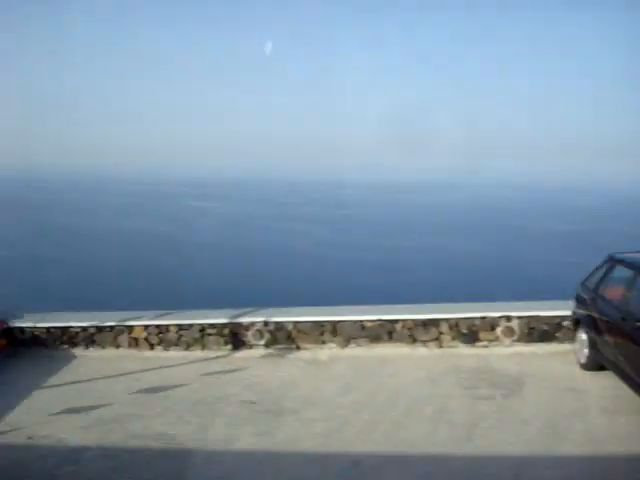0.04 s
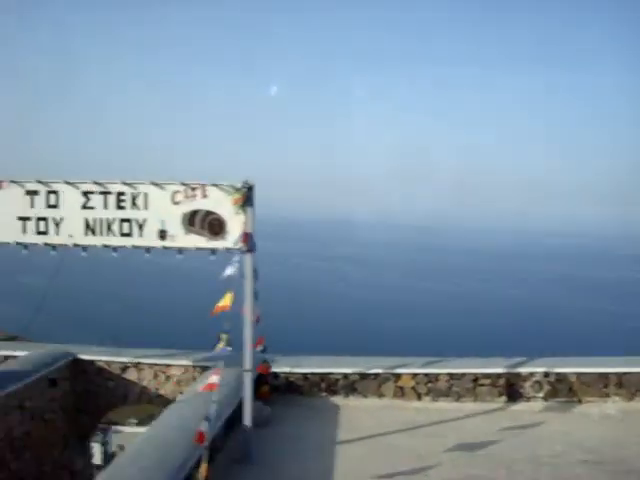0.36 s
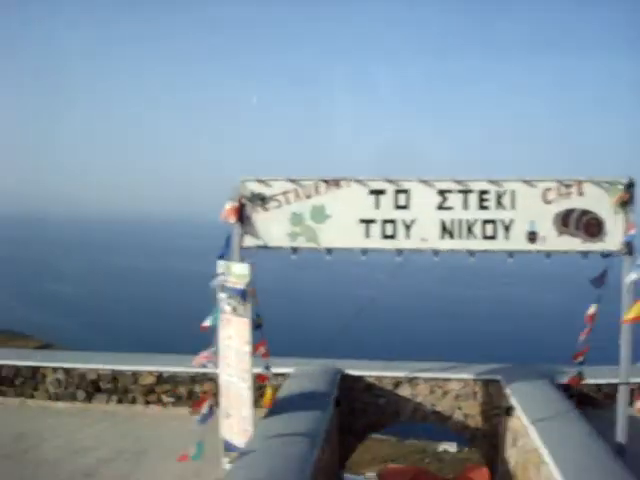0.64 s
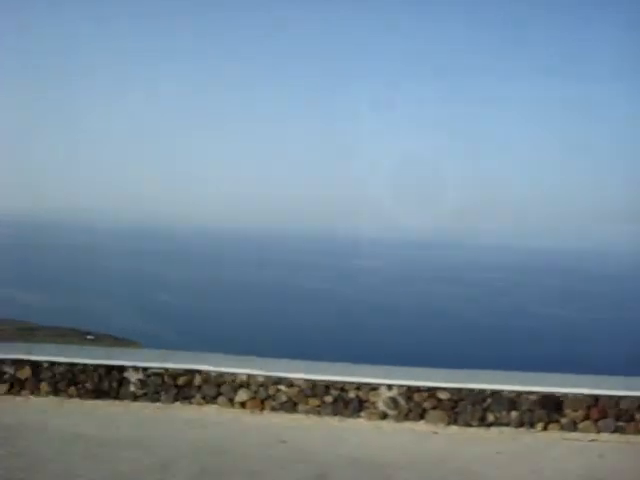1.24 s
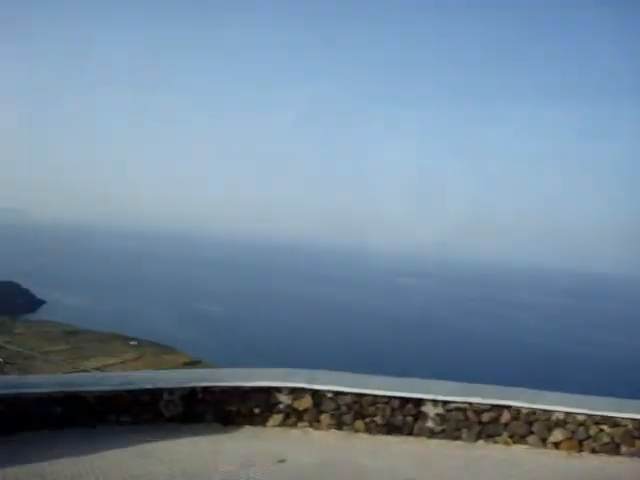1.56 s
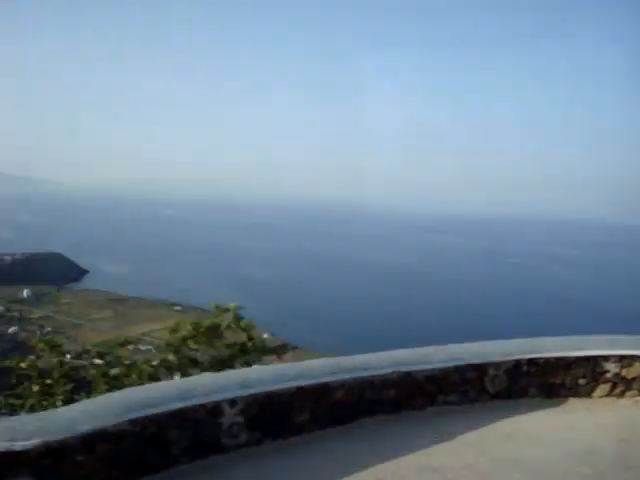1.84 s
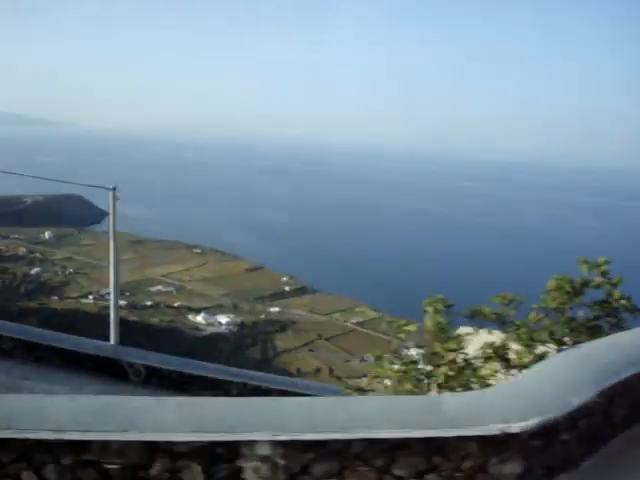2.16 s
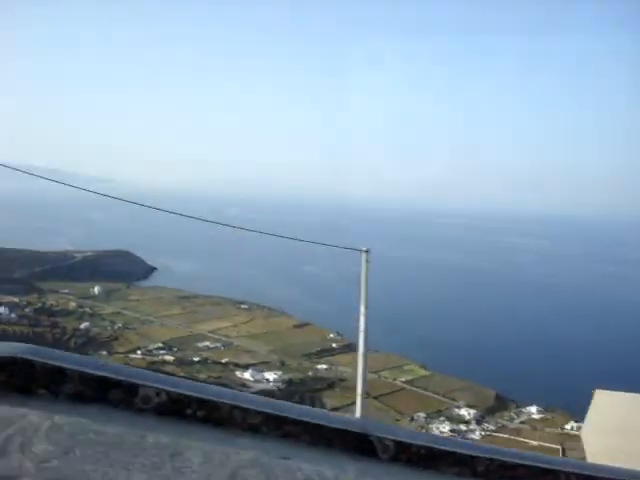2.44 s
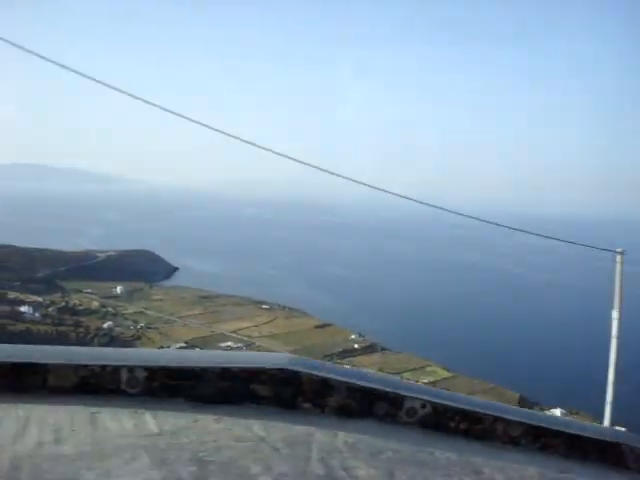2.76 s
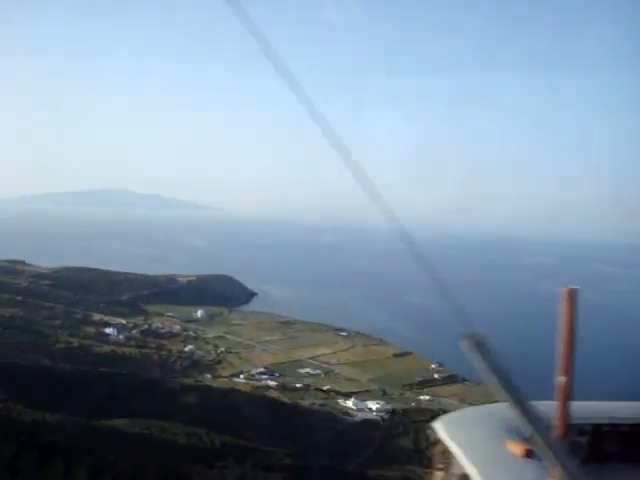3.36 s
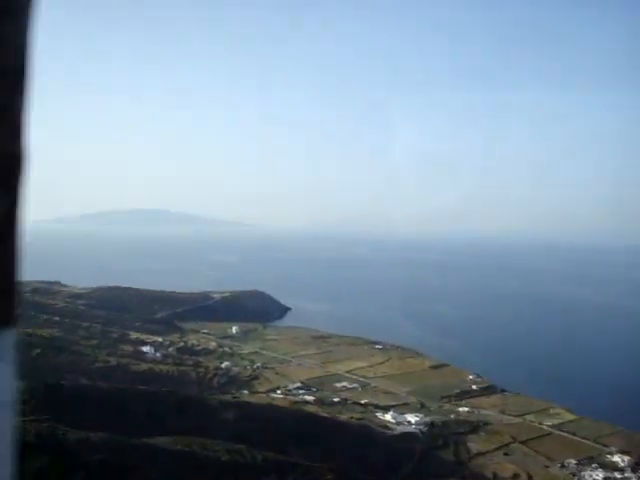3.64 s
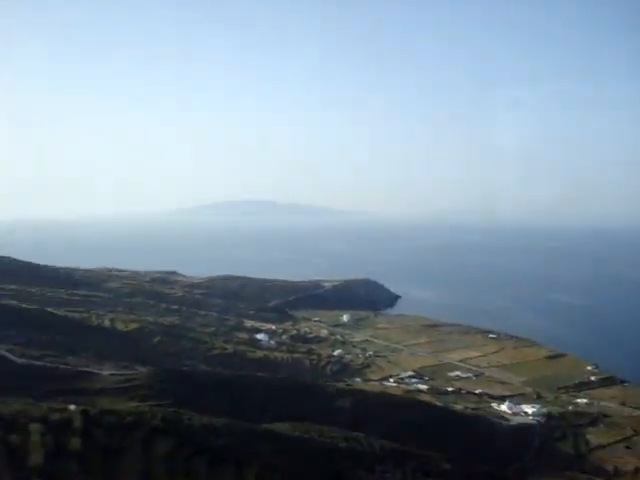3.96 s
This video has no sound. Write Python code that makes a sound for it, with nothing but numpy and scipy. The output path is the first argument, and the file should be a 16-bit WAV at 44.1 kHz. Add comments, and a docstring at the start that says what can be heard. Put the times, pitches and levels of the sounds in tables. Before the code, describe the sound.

A bus rumbles steadily throughout, heard from a window seat, with tyre noise, engine drone and ventilation blowers throbbing over rushing air. Trim ticks around 0.7 seconds and hard plastic clicks at 1.4, as the engine tones grow slightly. A faintly ringing panel squeaks briefly at 2.2, and a hum swells around 3 seconds. A few more clicks come near 3.9. A faint electronic whine and buzz lie underneath.

```python
"""Bus cabin on a coast road

A camera's microphone at a window seat, the bus rolling steadily. Tyre and engine rumble boom in the
cabin; ventilation blowers at nearly the same speed hum and beat against each other over a rush of air.
Engine tones grow with the load and a panel sings faintly. Trim ticks, hard plastic clicks once early
and a few times near the end, and the camera adds a faint whine and buzz."""
import sys
import numpy as np
from scipy import signal
from scipy.io import wavfile

SR = 44100
rng = np.random.default_rng(int(sys.argv[2]) if len(sys.argv) > 2 else 0)


def transcribe(signal):
    """Save signal, clipped to [-1, 1], as a 16-bit WAV file at the path in sys.argv[1]."""
    frames = np.atleast_2d(signal).T
    limited = np.clip(frames, -1, 1)
    pcm = np.round(limited * 32767).astype(np.int16)
    wavfile.write(sys.argv[1], SR, pcm)


N = 176400


def from_db(db):
    """Decibels to gain."""
    return 10 ** (np.asarray(db) / 20)


def rms_one(x):
    """Scale to unit rms."""
    return x / np.sqrt(np.mean(x ** 2) + 1e-20)


def seconds():
    """Time of every sample."""
    return np.arange(N) / SR


def level_curve(rows):
    """Gain over time, from rows of time in seconds and level in dB."""
    return from_db(np.interp(seconds(), *np.transpose(rows)))


def drift(rate_hz):
    """Slow random motion of rms about 1, mostly below rate_hz."""
    hop, run_in = 40, 2000
    pole = np.exp(-2 * np.pi * rate_hz * hop / SR)
    noise = rng.standard_normal(N // hop + run_in + 2)
    slow = signal.lfilter([1], [1, -2 * pole, pole * pole], noise)[run_in:]
    return np.interp(np.arange(N) / hop, np.arange(len(slow)), rms_one(slow))


def band_noise(hz, width_hz):
    """Steady noise of rms 1 ringing in one band."""
    middle = np.hypot(hz, width_hz / 2)
    edges = np.clip([middle - width_hz / 2, middle + width_hz / 2], 10, .45 * SR)
    sos = signal.butter(2, edges, "band", fs=SR, output="sos")
    return rms_one(signal.sosfilt(sos, rng.standard_normal(N + SR // 2))[-N:])


def tone(hz, wander_hz, rate_hz, zero_phase_s=0):
    """A sine of rms 1 whose pitch wanders."""
    cycles = np.cumsum(hz + wander_hz * drift(rate_hz)) / SR
    return np.sqrt(2) * np.sin(2 * np.pi * (cycles - np.interp(zero_phase_s, seconds(), cycles)))


def road():
    """Tyre rumble and rushing air fill the cabin, in gently flickering sixth-octave bands."""
    # The noise at the seat. Each row: frequency in Hz, relative spectral density in dB.
    spectrum = [(20, -25.5), (35, -17), (58, -17.5), (100, -4), (150, 0.5), (200, -1), (300, -1.5),
                (400, -2), (560, -1), (770, -5.5), (840, -11), (950, -4.5), (1030, -8), (1220, -11.5),
                (1400, -14), (1750, -15), (2000, -18.5), (2450, -20), (3000, -27), (3700, -30),
                (4400, -37.5), (5400, -30), (6500, -36.5), (8000, -42), (10000, -55.5)]
    # Swells of the low rumble and of the rush above it. Each row: time in seconds, gain in dB.
    rumble_level = [(0, 0), (.6, -1), (.9, -0.5), (1.3, -0.5), (1.7, -0.2), (2.1, -0.5), (2.4, 0.9),
                    (2.7, -0.65), (3.1, -0.1), (3.5, -0.5), (4, -0.5)]
    rush_level = [(0, -0.5), (.45, 0), (.6, 0.4), (1, -0.5), (1.35, -0.6), (1.66, 1.5), (1.8, -0.5),
                  (2.2, -0.7), (2.42, 0.2), (2.9, 0), (3.25, 0), (3.6, -0.6), (3.9, -0.5)]
    rush_above_hz, hiss_above_hz, flicker_db = 1300, 4000, 0.76
    rumble, rush = level_curve(rumble_level), level_curve(rush_level)
    spectrum_hz, spectrum_db = np.transpose(spectrum)
    noise = 0
    for hz in 20 * 2 ** np.arange(0, 9.1, 1 / 6):
        width = hz * np.log(2) / 6
        db = np.interp(np.log(hz), np.log(spectrum_hz), spectrum_db) + flicker_db * drift(11.5)
        swell = rumble if hz < rush_above_hz else rush if hz < hiss_above_hz else 1
        noise += swell * np.sqrt(width) * from_db(db) * band_noise(hz, width)
    return from_db(-20.5) * rms_one(noise)


def blowers():
    """Ventilation blowers: nearly equal tones, each fluttering on its own, beat into an uneven throb."""
    # Blower tones. Each row: pitch in Hz, level in dB before the swells.
    tones = [(267.7, -44), (490, -42.5), (493.2, -37.5), (495, -43.5), (525.4, -34.5), (532.95, -32.5),
             (535.5, -30), (543.2, -35.5), (803.4, -42.5), (1071, -46)]
    # Swells of the whole hum. Each row: time in seconds, gain in dB.
    swells = [(0, -2.5), (.42, -5), (.8, 2), (1.1, 0.5), (1.6, 2), (1.78, -6.5), (1.88, 5.5), (2.0, -1.5),
              (2.35, -3), (2.5, 4), (2.65, -3.5), (2.88, 3.5), (3.1, -1.5), (3.6, .5), (4, -1)]
    flutter_db, in_phase_s = 1.25, 2.375
    hum = 0
    for hz, db in tones:
        gain = from_db(db + flutter_db * drift(5))
        hum += gain * tone(hz, wander_hz=0.044, rate_hz=0.86, zero_phase_s=in_phase_s)
    return level_curve(swells) * hum


def cabin_boom():
    """The road stirs a few resonances of the body, more strongly as the ride goes on."""
    # Cabin resonances. Each row: centre in Hz, width in Hz, level in dB before the boom's rise.
    resonances = [(152.7, 41, -32), (674.6, 32, -33.5), (899.3, 47, -33.5)]
    return sum(from_db(db) * band_noise(hz, width) for hz, width, db in resonances)


def engine_drone():
    """The engine's low drone, unsteady in pitch and level."""
    # Drone tones. Each row: pitch in Hz, wander in Hz, level in dB before the swells.
    tones = [(50.3, 1.7, -52.5), (75, 2.2, -41)]
    # Swells of the drone. Each row: time in seconds, gain in dB.
    swells = [(0, -5), (.45, 1), (.8, 0), (1.3, -1), (1.75, 8), (2.1, -4), (2.4, 2), (2.8, -2), (3.2, 4.5),
              (4, -3)]
    drone = sum(from_db(db) * tone(hz, wander, rate_hz=6) for hz, wander, db in tones)
    return level_curve(swells) * drone


def engine_load():
    """Higher engine tones that come up under load."""
    # Load tones. Each row: pitch in Hz, wander in Hz, level in dB before the boom's rise.
    tones = [(157.6, 4.77, -36), (671.6, 5.5, -37.5), (789, 2, -41.5), (815, 1.5, -44), (896, 6.96, -38)]
    return sum(from_db(db) * tone(hz, wander, rate_hz=5) for hz, wander, db in tones)


def body_hums():
    """Two hums of the bus body take turns."""
    # The lower and the higher hum. Each row: time in seconds, level in dB.
    low_level = [(0, -36.5), (.55, -33.5), (1.0, -30.5), (1.3, -43), (2.0, -37.5), (3.0, -37), (4, -41)]
    high_level = [(0, -32.5), (.7, -39.5), (1.3, -37.5), (1.65, -29), (2.1, -33.5), (2.35, -33.5),
                  (2.7, -36.5), (2.81, -22), (2.93, -40), (3.07, -26), (3.17, -30), (3.27, -25.5),
                  (3.37, -43.5), (4, -35)]
    low = level_curve(low_level) * tone(233.7, wander_hz=1.89, rate_hz=5.5)
    high = level_curve(high_level) * tone(260.6, wander_hz=1.89, rate_hz=5.5)
    return low + high


def panel():
    """A body panel sings: a thin, wavering ring that comes and goes and once swells to a brief squeak."""
    # The panel's ring. Each row: time in seconds, level in dB.
    ring_level = [(0, -52), (.2, -41), (.55, -47), (.95, -44), (1.05, -36), (1.2, -47), (1.5, -43),
                  (1.8, -45), (2.08, -48), (2.17, -32.5), (2.27, -53), (2.42, -42), (2.85, -48.5), (4, -56)]
    return level_curve(ring_level) * tone(1781, wander_hz=13, rate_hz=13.94)


def plastic_clicks():
    """Each hard touch grates briefly and rings the plastic, favouring modes near its centre frequency."""
    # Touches. Each row: start in seconds, rms level in dB with the energy taken over 4 ms,
    # centre in Hz, spread in octaves, decay of the grating in seconds.
    touches = [(1.3602, -22, 2180, 0.38, 0.0013), (1.3608, -35, 5200, .13, .0015),
               (3.9241, -26, 3500, 0.39, .0007), (3.9787, -25.5, 5500, .22, 0.0017),
               (3.9788, -24, 2980, 0.64, .0015), (3.984, -31, 4400, .15, .0008),
               (3.9881, -23, 3000, 0.27, .0003)]
    # Modes of the plastic. Each row: frequency in Hz, relative level in dB, seconds to fall 60 dB.
    modes = [(1900, -1, 0.018), (2510, -1.5, .014), (3000, 3, 0.006), (3530, -3, 0.006),
             (4400, -2.5, 0.0081), (5420, -1, 0.018), (5940, 5, 0.0095), (6500, -9, 0.0061)]
    roughness, rise_s, level_window_s = 0.21, .0002, .004
    age = np.arange(SR // 20) / SR
    clicks = 0
    for start_s, db, centre_hz, spread, grate_s in touches:
        ring = 0
        for hz, mode_db, t60 in modes:
            weight = np.exp(-.5 * (np.log2(hz / centre_hz) / spread) ** 2)
            ring += weight * from_db(mode_db - 60 * age / t60) * np.sin(2 * np.pi * hz * age)
        contact = (age == 0) + roughness * np.exp(-age / grate_s) * rng.standard_normal(len(age))
        click = signal.fftconvolve(contact, ring * (1 - np.exp(-age / rise_s)))
        rms = np.sqrt(np.sum(click ** 2) / (level_window_s * SR))
        clicks += from_db(db) * np.pad(click / rms, (int(start_s * SR), N))[:N]
    return clicks


def trim_rattle():
    """Trim shakes in tiny random touches, each a quickly fading puff of bright noise."""
    touches_per_s, decay_s, centre_hz = 45, 0.003, 5670
    touches = (rng.random(N) < touches_per_s / SR) * rng.uniform(.5, 1, N)
    shake = signal.lfilter([1], [1, -np.exp(-1 / (decay_s * SR))], touches + 1e-18)
    return from_db(-56) * rms_one(shake * band_noise(centre_hz, 0.29 * centre_hz))


def trim_ticks():
    """Loose fittings scuff: each dry contact is a short burst in a broad resonance."""
    # Scuffs. Each row: start in seconds, level in dB before the envelope, centre in Hz, decay in seconds.
    scuffs = [(.631, -40, 7500, .002), (.682, -34, 6200, .0015), (.715, -30, 6000, .002),
              (.722, -31, 7000, 0.0032), (.732, -38, 6200, 0.0053), (1.082, -31, 4200, .003),
              (3.852, -33, 6300, 0.0044), (3.868, -34, 6800, .002), (3.945, -36, 6500, 0.0048)]
    rise_s = 0.0024
    ticks = 0
    for start_s, db, hz, decay_s in scuffs:
        age = np.maximum(seconds() - start_s, 0)
        envelope = np.minimum(age / rise_s, 1) * np.exp(-age / decay_s)
        burst = rms_one(envelope * band_noise(hz, 0.29 * hz))
        ticks += from_db(db) * np.sqrt(np.mean(envelope ** 2)) * burst
    return ticks


def drive_whistles():
    """The drive gives off a few thin, wavering whistles."""
    # Whistles. Each row: pitch in Hz, wander in Hz, level in dB.
    tones = [(2450, 5.5, -52.5), (3320, 6, -58.5), (3780, 6, -62), (3820, 6.1, -62), (5730, 3.7, -67.5)]
    return sum(from_db(db) * tone(hz, wander, rate_hz=12) for hz, wander, db in tones)


def camera():
    """Electronics by the microphone whine, and a tiny tick at every picture scan makes a buzz."""
    # The whine. Each row: pitch in Hz, level in dB.
    tones = [(7702, -71), (7792, -76.5), (7822, -73.5), (7852, -62.5), (7882, -62.5), (7912, -71.5)]
    scan_hz, first_tick_s, decay_s, tick_hz = 59.94, .0146, .0006, 6100
    whine = sum(from_db(db) * tone(hz, wander_hz=0.052, rate_hz=0.97, zero_phase_s=rng.random())
                for hz, db in tones)
    age = (seconds() - first_tick_s) % (1 / scan_hz)
    buzz = from_db(-40) * np.exp(-age / decay_s) * band_noise(tick_hz, tick_hz / 2)
    return whine + buzz


def scene():
    """Everything as heard by one microphone at a window seat."""
    # The boom's rise, shared by cabin resonances and load tones. Each row: time in seconds, gain in dB.
    boom_level = [(0, -4), (.8, -5.5), (1.3, 0), (1.8, -0.5), (2.4, 2), (3.0, 1), (3.5, 1.5), (4, 2.5)]
    rise = level_curve(boom_level)
    rolling = road() + rise * cabin_boom()
    machinery = engine_drone() + drive_whistles() + rise * engine_load() + body_hums() + blowers()
    details = trim_rattle() + trim_ticks() + panel() + camera() + plastic_clicks()
    return (rolling + machinery + details)[None]


def record(dry):
    """The treble is cut steeply above 10 kHz."""
    return signal.sosfilt(signal.ellip(12, .2, 80, 10050, fs=SR, output="sos"), dry)


dry = scene()
out = record(dry)
transcribe(out)
```